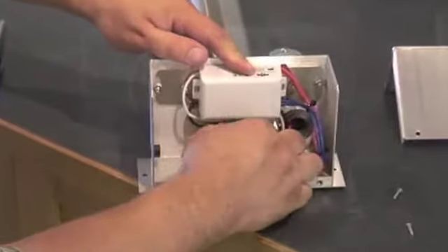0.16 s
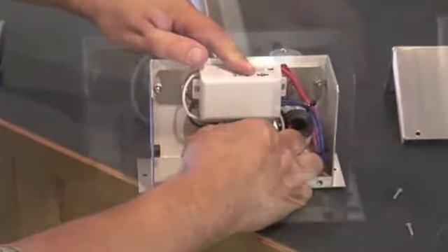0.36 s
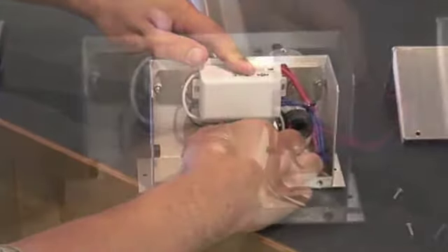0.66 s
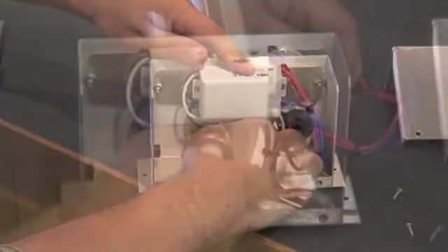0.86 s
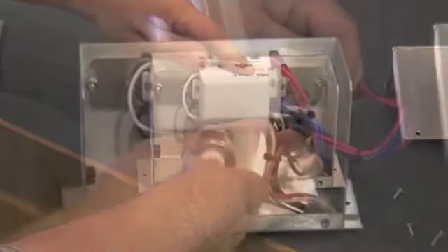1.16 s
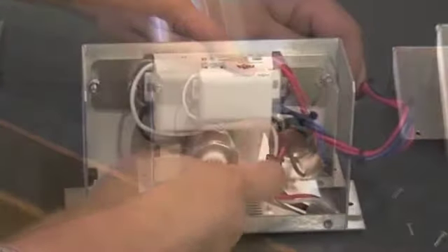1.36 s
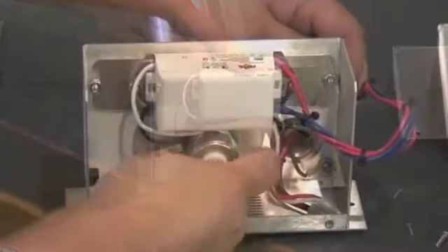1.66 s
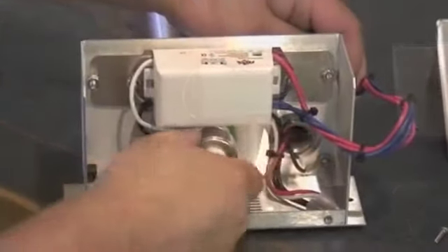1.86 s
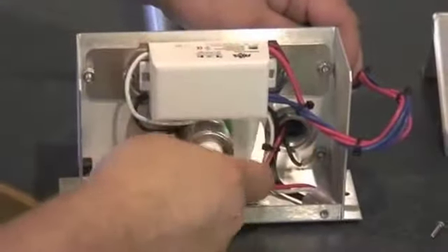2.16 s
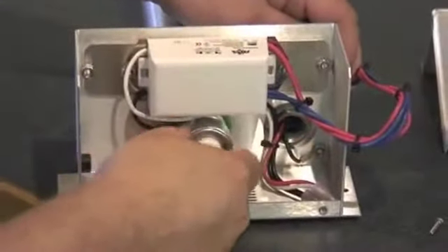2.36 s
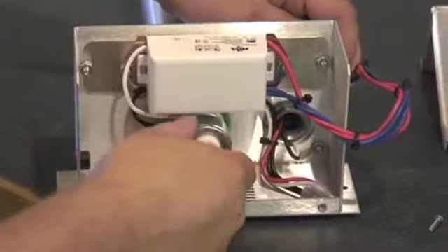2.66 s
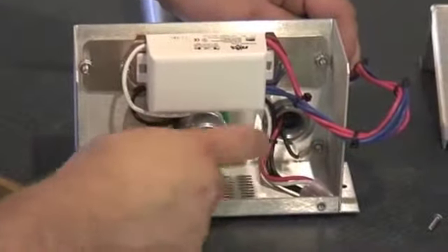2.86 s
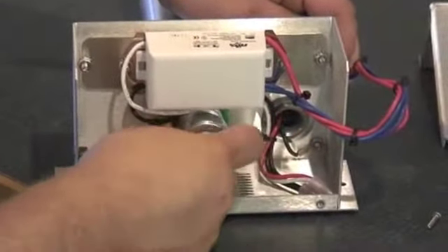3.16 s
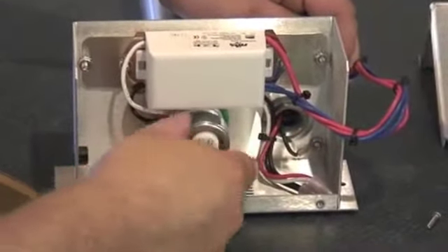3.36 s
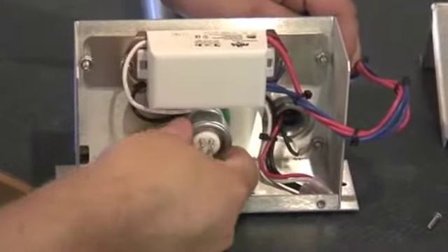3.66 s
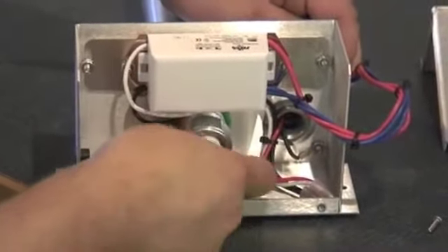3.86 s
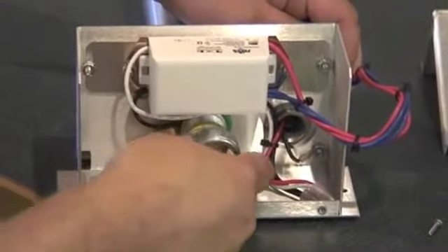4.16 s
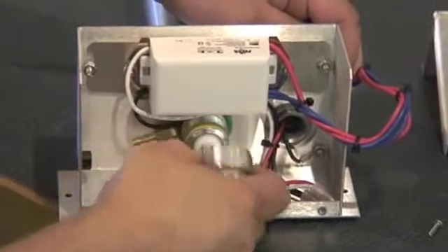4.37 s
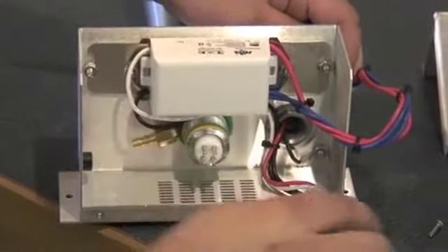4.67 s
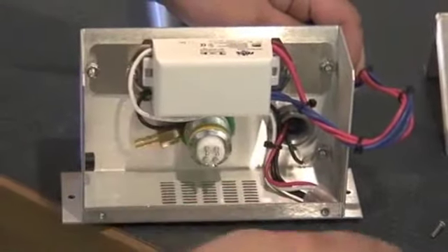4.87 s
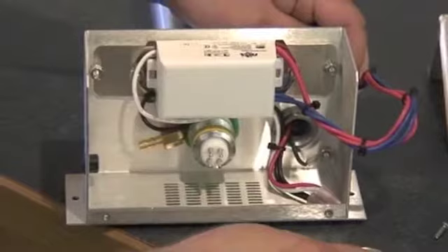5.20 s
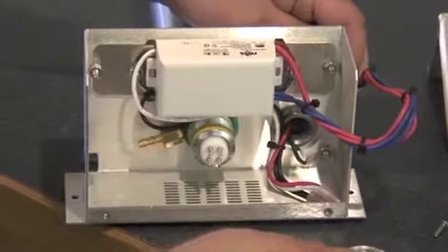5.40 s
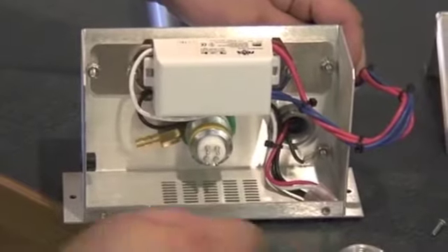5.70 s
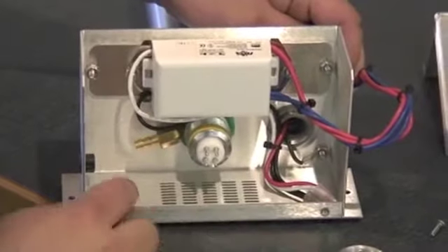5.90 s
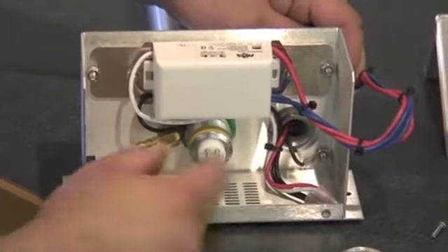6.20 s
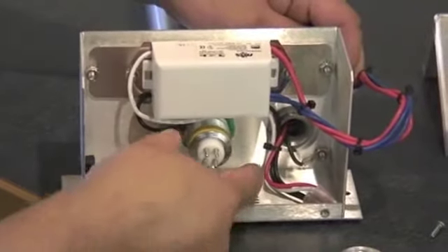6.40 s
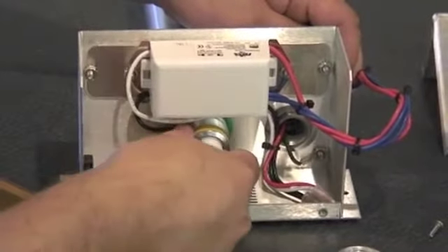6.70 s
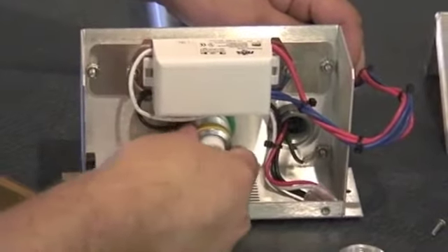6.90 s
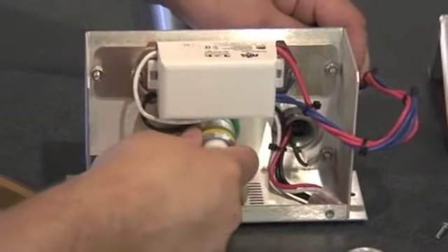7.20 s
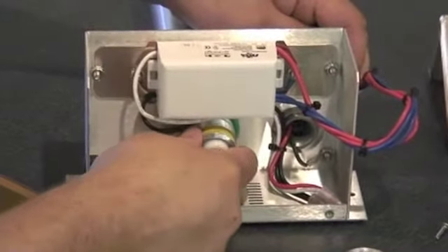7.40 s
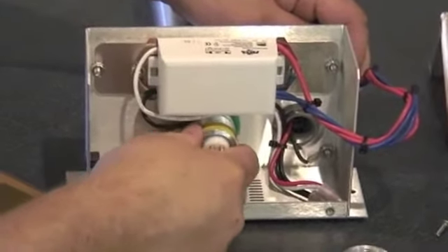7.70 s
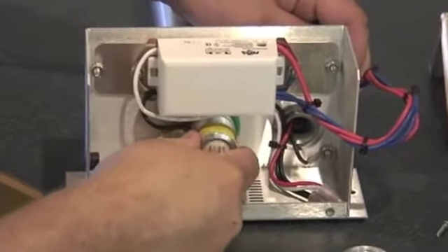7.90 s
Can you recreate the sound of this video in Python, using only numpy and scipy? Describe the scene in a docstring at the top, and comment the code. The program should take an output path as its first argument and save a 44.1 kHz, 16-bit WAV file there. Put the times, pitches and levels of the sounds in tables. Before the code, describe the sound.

Faint scrapes grow into a run of sharp, ringing zips and clicks as a threaded metal ring is spun off by hand in a sheet-metal box. The hardest flicks leave a thin singing tone. It loosens with lighter clicks, then two dull knocks and a clear clink sound on the bench. Fingers brush the metal softly at the end. Close microphone, short room echo, low fan hum.

```python
"""A metal nut is spun off a threaded lamp socket in a sheet-metal housing, one finger flick at a time.
Uneven catches make its rasp, short rebounds its clicks, and both excite the modes of the housing; the thread chirps
and the hardest flicks leave the nut singing. Two clear knocks and some faint ones excite the bench, the nut clinks
at a tap and as it is set down, and fingers rub on the socket. Filtered noise makes the small room's echoes and
the humming ventilation."""
import sys
import numpy as np
from scipy import signal
from scipy.fft import rfft, irfft, next_fast_len
from scipy.io import wavfile

SR = 44100
rng = np.random.default_rng(int(sys.argv[2]) if len(sys.argv) > 2 else 0)


def master(y):
    """Save y as 16-bit WAV."""
    cut = np.clip(np.atleast_2d(y).T, -1, 1)
    pcm = np.round(cut * 32767)  # scale
    wavfile.write(sys.argv[1], SR, pcm.astype(np.int16))


N = 355005
TIME = np.arange(N) / SR
MEDIUM_DB = -30  # force level at which click brightness and chirp pitch take their stated values


def from_db(db):
    """Level law: decibels to amplitude gain."""
    return 10 ** (np.asarray(db) / 20)


def unit(x):
    """Energy normalization: scale each channel to an energy of one."""
    return x / np.sqrt(np.sum(x ** 2, axis=-1, keepdims=True) + 1e-20)


def at_hz(points, hz):
    """Spectral interpolation: read a table on a log-frequency axis."""
    points = np.array(points)
    return np.interp(np.log(hz), np.log(points[:, 0]), points[:, 1])


def through(x, response):
    """Linear superposition: convolve a sound with an impulse response."""
    return signal.fftconvolve(np.atleast_2d(x), np.atleast_2d(response), axes=-1)[:, :N]


def lowpass(x, hz, order=1):
    """Treble loss: attenuate what lies above a cutoff."""
    return signal.sosfilt(signal.butter(order, min(hz, .45 * SR), fs=SR, output="sos"), x)


def tilt_at(x, hz, db, q):
    """Resonant filtering: raise or lower the band around one frequency."""
    resonance = signal.iirpeak(min(hz, .45 * SR), q, fs=SR)
    return x + (from_db(db) - 1) * signal.lfilter(*resonance, x)


def add(track, s, burst, bright_hz, wall_db=0, order=2):
    """Contact filtering: soft contact loses treble, a sideways push drives the main mode of the housing wall."""
    contact = lowpass(burst, bright_hz, order)
    contact = tilt_at(contact, 1550, wall_db, q=4.8)
    start = max(round(s * SR), 0)
    track[start:start + len(contact)] += contact[:max(N - start, 0)]


def body(spectrum, modes=(), size=32768):
    """Modal response: the minimum-phase ring of named resonances over a bed of dense modes."""
    hz = np.maximum(np.arange(size // 2 + 1) * SR / size, 1)
    power = from_db(at_hz(spectrum, hz)) ** 2
    for centre, width, db in modes:
        resonance = 1 / (1 + (2 * (hz - centre) / width) ** 2)
        skirt = 1 / (1 + (10 * np.log(hz / centre)) ** 2)
        power = power + from_db(db) ** 2 * resonance * skirt
    # keeping one side of the cepstrum makes the response causal
    cepstrum = irfft(np.log(power))[:size // 2]
    cepstrum[0] /= 2
    return unit(irfft(np.exp(rfft(cepstrum, size))))


def rebounds(hold_s, t60, count=3):
    """Repeated impact: a colourless cluster that builds, holds briefly and decays exponentially."""
    t = TIME[:SR // 8]
    build = np.minimum(3 * (t + 1 / SR) / hold_s, 1)
    fade = build * from_db(-60 * np.maximum(t - hold_s, 0) / t60)
    cluster = rng.standard_normal(len(t)) * fade
    for _ in range(count):
        # flatten the spectrum, then restore the fade
        phase = np.angle(rfft(cluster, 2 * len(t)))
        cluster = irfft(np.exp(1j * phase))[:len(t)] * np.sqrt(np.sqrt(fade))
    return unit(cluster)


def blows(rows, hold_s, bounce_t60, contact_s, order=2):
    """Impact excitation: the force of single blows, each a quick cluster of rebounds."""
    force = np.zeros(N)
    for s, db, *colour in rows:
        burst = from_db(db) * np.sqrt(contact_s * SR) * rebounds(hold_s, bounce_t60)
        add(force, s, burst, *colour, order=order)
    return force


def grains(catches, low_hz, high_hz, q, count=10):
    """Damped resonance: each catch rings for a few cycles at one of several pitches."""
    dealt = rng.integers(0, count, len(catches))
    total = np.zeros(len(catches))
    for k, hz in enumerate(np.geomspace(low_hz, min(high_hz, .45 * SR), count)):
        total += signal.lfilter(*signal.iirpeak(hz, q, fs=SR), catches * (dealt == k)) / np.sqrt(hz)
    return total


def slides(rows, catches_per_s, spread_db, grain_db, light_hz):
    """Sliding friction: uneven catches swell and fade by 20 dB in the rise and fall times, light contact duller."""
    force = np.zeros(N)
    for s, db, rise, fall, *colour in rows:
        t = TIME[:SR // 2] - min(s, 1 / 4)  # zero at the peak
        swell = from_db(-20 * np.where(t < 0, np.abs(t / rise) ** 1.61, t / fall))
        chance, sign = rng.random((2, len(t)))
        sizes = from_db(spread_db * np.clip(rng.standard_normal(len(t)), -2, 2))
        catches = (chance < catches_per_s / SR) * np.sign(sign - .5) * sizes
        ringing = grains(rng.permutation(catches), low_hz=2050, high_hz=9400, q=4.9)
        rasp = unit(catches) + from_db(grain_db) * unit(ringing)
        dull = lowpass(rasp, light_hz)
        rasp = dull + swell * (rasp - dull)
        burst = from_db(db) * unit(rasp * swell) * np.linalg.norm(swell)
        add(force, s + t[0], burst, *colour)
    return force


# spectral density of the ventilation's rush: pitch_hz, level_db (relative, per Hz)
AIR_SPECTRUM = [(20, -31), (45, -11.5), (65, -4.5), (150, -4.5), (210, -9), (440, -15), (1000, -21),
                (2500, -27), (5700, -31.5), (12700, -33.5), (15000, -52)]
# fan and duct tones: pitch_hz, width_hz (at half amplitude), level_db (before the hum trim)
FAN_TONES = [(44, 12, -55.5), (121.9, 5.2, -58), (241.9, 5.3, -62.5), (356.1, 8.1, -60.5),
             (385.5, 4.4, -64.5)]
# left-right coherence of the ventilation: pitch_hz, likeness (0 to 1)
AIR_COHERENCE = [(50, 0.97), (150, 0.54), (400, 0.31), (6000, 0.19)]


def ventilation(air_db, hum_db, left_db):
    """Stationary noise: a steady rush of air with narrow, wavering fan tones."""
    half = next_fast_len(N // 2 + 1)
    hz = np.maximum(np.arange(half + 1) * SR / (2 * half), 1)
    power = from_db(air_db) ** 2 * unit(from_db(at_hz(AIR_SPECTRUM, hz))) ** 2
    for centre, width, db in FAN_TONES:
        tone = unit(1 / (1 + ((hz - centre) / width * 2) ** 2))
        power = power + (from_db(db + hum_db) * tone) ** 2
    alike = np.clip(at_hz(AIR_COHERENCE, hz), 0, 1)
    mid, side = rfft(rng.standard_normal((2, 2 * half)))
    both = mid + np.sqrt((1 - alike) / (1 + alike)) * side * [[1], [-1]]
    balance = from_db(np.array([[1], [-1]]) * left_db)
    return irfft(both * np.sqrt(power * half))[:, :N] * balance


ROOM_T60_S = 0.35


def room(x, early_db, tail_db, early_t60, wall_hz, side_db):
    """Reverberation: direct sound, near reflections from the bench and a duller exponential tail."""
    t = TIME[:SR]
    near, far = rng.standard_normal((2, 2, len(t)))
    near = unit(near * from_db(-60 * t / early_t60))
    far = unit(far * from_db(-60 * t / ROOM_T60_S) * np.minimum(t / .012, 1))  # 12 ms onset
    far = lowpass(far, wall_hz)
    mid, side = from_db(early_db) * near + from_db(tail_db) * far
    # echoes differ between the microphone ports mostly in the treble
    treble = signal.butter(1, 5000, "high", fs=SR, output="sos")
    side = from_db(side_db) * signal.sosfilt(treble, side)
    return x + through(x, [mid + side, mid - side])


def ports(x, spacing_s, widest_rad, size=1024):
    """Phase difference: each frequency reaches two close microphone ports from its own direction."""
    hz = np.arange(size // 2 + 1) * SR / size
    direction = np.sin(2 * np.pi * np.cumsum(rng.random(len(hz))) / 10)
    # the phase lead grows with frequency up to its limit, so the treble spreads most
    lead = np.exp(1j * np.minimum(np.pi * hz * spacing_s, widest_rad) * direction * [[1], [-1]])
    response = np.roll(irfft(lead), size // 2, axis=1)
    return signal.fftconvolve(x, response, axes=-1)[:, size // 2:size // 2 + N]


# dull knocks on the bench: start_s, level_db (of force), brightness_hz (of contact)
KNOCKS = [(.157, -38.5, 1480), (5.056, -29, 1850), (5.192, -30, 4300), (5.781, -46, 6000),
          (6.944, -45, 1400)]
# dense modes of the bench: pitch_hz, level_db (relative)
BENCH_SPECTRUM = [(150, -53), (450, -11), (750, -2), (1000, -2.5), (1200, -5), (1750, -6.5), (2500, -4.5),
                  (3600, -6.5), (4200, -19), (5200, -8), (14000, -16)]
# named modes of the bench: pitch_hz, width_hz, level_db (relative)
BENCH_MODES = [(990, 120, 3.5), (1700, 240, 2.5), (2100, 330, 0.5)]


def bench_knocks():
    """Impact on a damped plate: dull blows excite the modes of the bench."""
    force = blows(KNOCKS, hold_s=0.0075, bounce_t60=0.044, contact_s=0.0053, order=4)
    return through(force, body(BENCH_SPECTRUM, BENCH_MODES))


# the nut struck by itself, at a tap and as it touches down: start_s, level_db (of force), brightness_hz (of contact)
CLINKS = [(3.400, -43.5, 6000), (5.741, -31, 14000)]
# dense modes of the nut: pitch_hz, level_db (relative)
NUT_SPECTRUM = [(500, -57), (1500, -20), (2500, -13), (4800, -15), (6200, -9), (9300, -13), (14000, -19)]
# named modes of the nut: pitch_hz, width_hz, level_db (relative)
NUT_MODES = [(2530, 83, -2.5), (3410, 290, 1), (3590, 12, 8.5), (3960, 67, 3), (7650, 120, 0),
             (9300, 160, -4)]


def nut_clinks():
    """Free modal ringing: blows excite the nut's own resonances."""
    force = blows(CLINKS, hold_s=0.0057, bounce_t60=0.027, contact_s=0.0064)
    return through(force, body(NUT_SPECTRUM, NUT_MODES))


# skin sliding on metal: peak_s, level_db (of force), rise_s
RUBS = [(0.058, -48, 0.017), (5.958, -46.5, 0.13), (6.022, -41.5, 0.023), (6.185, -51.5, 0.042),
        (6.365, -46.5, 0.03), (7.125, -41, 0.034), (7.607, -53, 0.0054), (8.045, -44.5, 0.074)]
# a quick rub is brighter and ends sooner
RUB_HZ, RUB_DULLING_OCTAVES_PER_S = 12700, 15
RUB_FALL_S, RUB_FALL_PER_RISE = 0.011, 0.62


def rubs():
    """Fine friction: skin catches on the metal; slow rubs are dull and linger."""
    rows = []
    for s, db, rise in RUBS:
        fall = RUB_FALL_S + RUB_FALL_PER_RISE * rise
        bright_hz = RUB_HZ * 2 ** (-RUB_DULLING_OCTAVES_PER_S * rise)
        rows.append((s, db, rise, fall, bright_hz))
    return slides(rows, catches_per_s=5000, spread_db=4, grain_db=-16.5, light_hz=12100)


# response of the rubbing skin: pitch_hz, level_db (relative)
SKIN_SPECTRUM = [(200, -20), (900, 1.5), (2000, -5.5), (4700, -1), (9500, 0.5), (12000, -5), (15000, -35)]


def rubbing_fingers(skin):
    """Damped radiation: the rubbing force sounds through the broad response of skin."""
    return from_db(-1.5) * through(skin, body(SKIN_SPECTRUM))


# the hardest flicks leave the nut singing: start_s, level_db
SINGS = [(0.786, -45), (1.088, -53), (1.367, -54)]
# the modes that sing on: pitch_hz, level_db (relative to the singing), t60_s
SING_MODES = [(3430, -1, .3), (3550, -5, .5), (4020, 0.5, 1.1), (4506, -2, 0.27)]


def singing():
    """Light damping: modes decay exponentially while the finger is clear of the nut."""
    out, t = np.zeros(N), TIME[:SR]
    for s, db in SINGS:
        ring = np.zeros(len(t))
        for hz, mode_db, t60 in SING_MODES:
            decay = np.exp(-np.log(1000) * t / t60)
            ring += from_db(db + mode_db) * decay * np.sin(2 * np.pi * hz * t)
        add(out, s, ring, bright_hz=SR)
    return out


# the thread chirps as the finger takes a new grip: start_s, level_db
CHIRPS = [(.998, -35.5), (1.279, -40), (1.597, -40.5), (2.279, -46.5), (2.382, -46.5), (2.726, -40),
          (3.569, -40), (4.153, -31.5), (7.912, -46)]
# each flick also chirps as it breaks loose (dB against the flick); pitch rises with force
BREAKAWAY_DB, CHIRP_HZ, CHIRP_HZ_PER_DB = -8.5, 2620, 26


def chirps(length_s, width_hz):
    """Stick-slip: brief squeaks, each around one pitch, at a new grip and at the start of every flick."""
    out = np.zeros(N)
    breakaways = [(s - run_up, db + BREAKAWAY_DB) for s, db, run_up, *_ in FLICKS]
    for s, db in list(CHIRPS) + breakaways:
        hz = CHIRP_HZ + CHIRP_HZ_PER_DB * (db - MEDIUM_DB)
        peak = signal.iirpeak(hz, hz / width_hz, fs=SR)
        squeak = signal.lfilter(*peak, rebounds(length_s, t60=0.12))
        squeak = signal.lfilter(*peak, squeak)
        add(out, s, from_db(db) * np.sqrt(length_s * SR) * unit(squeak), bright_hz=SR)
    return out


# the nut knocking against the thread: start_s, level_db (of force), wall_push_db
CLICKS = [(.157, -44.5, 13), (0.526, -32.5, -14), (.779, -15.5, -14), (1.021, -26, -3), (1.085, -16.5, 2),
          (1.365, -19, -4), (1.394, -34, 9), (1.66, -16, -7), (1.674, -26.5, 14.5), (1.739, -24.5, 7),
          (2.111, -40.5, 18), (2.148, -40.5, 14), (2.467, -16, -19), (2.573, -34.5, 2.5), (2.9, -23.5, -4),
          (3.114, -28.5, 4.5), (3.182, -28.5, 7), (3.479, -22.5, -2), (3.488, -24, -10), (3.739, -37.5, 10),
          (3.994, -45.5, -8), (4.054, -48, 13.5), (4.068, -37.5, 2), (4.082, -39, 10), (4.092, -35, 6.5),
          (4.109, -27.5, -12), (7.92, -50.5, 11)]
CLICK_HZ, CLICK_OCTAVES_PER_DB = 5600, 0.075  # brightness at the medium level, and its rise with force


def clicks():
    """Contact stiffness: the nut knocks against its play, and a harder contact is brighter."""
    rows = []
    for s, db, wall_db in CLICKS:
        bright_hz = CLICK_HZ * 2 ** (CLICK_OCTAVES_PER_DB * (db - MEDIUM_DB))
        rows.append((s, db, bright_hz, wall_db))
    return blows(rows, hold_s=0.0046, bounce_t60=0.048, contact_s=0.0038)


# the finger flicks the nut round: peak_s, level_db (of force), run_up_s, wall_push_db, brightness_hz (of contact)
FLICKS = [(0.164, -44, 0.0052, 8, 7000), (.376, -34, 0.022, 14, 6500), (.572, -40.5, 0.051, 6.5, 4180),
          (.787, -21.5, 0.029, 1, 10400), (1.08, -21.5, 0.018, 1, 7650), (1.367, -20, .026, -4, 7240),
          (1.67, -23, 0.028, -1, 5960), (2.058, -26.5, 0.037, 4.5, 6840), (2.474, -26, 0.03, -1.5, 6700),
          (2.842, -25.5, 0.041, 7, 6570), (3.207, -29, 0.029, 10.5, 5800), (3.498, -30.5, 0.021, 5.5, 6760),
          (4.145, -40.5, 0.077, 8.5, 5600)]
# some flicks leave the nut coasting into a second, weaker rasp: peak_s, level_db (of force)
COASTS = [(.465, -40.5), (.828, -36), (1.416, -42), (3.573, -43)]
# after its peak a flick dies away, more slowly after a long run-up
FLICK_FALL_S, FALL_PER_RUN_UP = 0.026, 0.34
COAST_RISE_S, COAST_FALL_S, COAST_HZ = 0.042, 0.044, 6500


def flicks():
    """Driven friction: each flick runs the nut up along the thread; sometimes it coasts on."""
    driven = []
    for s, db, run_up, wall_db, bright_hz in FLICKS:
        fall = FLICK_FALL_S + FALL_PER_RUN_UP * run_up
        driven.append((s, db, run_up, fall, bright_hz, wall_db))
    coasting = [(s, db, COAST_RISE_S, COAST_FALL_S, COAST_HZ) for s, db in COASTS]
    return slides(driven + coasting, catches_per_s=2400, spread_db=2.5, grain_db=-8.5, light_hz=6500)


# two resonances raised or lowered at each new grip: start_s, first_hz, first_db, second_hz, second_db
GRIPS = [(.1, 1740, 3, 2740, -13), (.68, 3450, 0, 6100, -5), (.96, 2880, 2.5, 8450, -4),
         (1.25, 2220, 3, 8500, -3), (1.57, 2870, 2.5, 2320, -5), (2.25, 6060, 6.5, 3800, 1),
         (2.7, 2660, -2, 5170, -6), (3.05, 9600, 7.5, 7800, -4), (3.88, 3040, -1, 7400, -3)]


def gripped(force, q):
    """Contact-point coupling: every grip moves the contact and so raises or lowers two resonances of the force."""
    out = np.zeros(N)  # silent before the first grip
    edges = [max(round(row[0] * SR), 0) for row in GRIPS] + [N]
    for (_, first_hz, first_db, second_hz, second_db), a, b in zip(GRIPS, edges, edges[1:]):
        once = tilt_at(force[a:b], first_hz, first_db, q)
        out[a:b] = tilt_at(once, second_hz, second_db, q)
    return out


# dense weaker modes of the housing: pitch_hz, level_db (relative)
HOUSING_SPECTRUM = [(480, -33), (1000, -19), (2050, -17), (3000, -12), (3550, -8), (3920, -13), (4400, -8),
                    (5250, -13.5), (5900, -13), (7800, -16), (10000, -17.5), (14000, -30)]
# named modes of the housing with socket and nut: pitch_hz, width_hz, level_db (relative)
HOUSING_MODES = [(651, 58, -16), (1632, 32, 4), (1703, 30, -2), (1770, 60, -9), (2277, 32, -1),
                 (2345, 40, -6), (2574, 85, -6), (2725, 24, 0), (2810, 110, -1), (2954, 52, .5),
                 (3013, 26, -5), (3193, 27, -9), (3392, 26, 1), (3570, 30, -6), (4252, 80, -4),
                 (4472, 45, -3), (4512, 8, -6), (6080, 6, -7), (6270, 130, -6), (7400, 40, -7),
                 (8390, 40, -6), (9620, 60, -13)]


def ringing_housing(thread, skin, squeaks):
    """Forced modal vibration: thread forces ring the sheet metal; rubs and chirps stir it faintly."""
    force = from_db(.5) * thread + from_db(-14) * (skin + squeaks)
    return through(force, body(HOUSING_SPECTRUM, HOUSING_MODES))


def scene():
    """Superposition: work on the housing, the knocks and clinks on the bench, the room behind."""
    thread = gripped(flicks() + clicks(), q=13.7)
    skin = rubs()
    squeaks = chirps(length_s=0.0043, width_hz=1120)
    housing = ringing_housing(thread, skin, squeaks)
    nut = squeaks + singing()
    work = housing + nut + rubbing_fingers(skin) + nut_clinks()
    near = room(work, early_db=-17.5, tail_db=-8.0, early_t60=0.078, wall_hz=10600, side_db=2.0)
    far = room(bench_knocks(), early_db=2, tail_db=-0.5, early_t60=0.096, wall_hz=4970, side_db=0.0)
    background = ventilation(air_db=-51, hum_db=-0.5, left_db=0.17)
    return ports(near + far, spacing_s=.000028, widest_rad=1.0) + background


CUTOFF_HZ = 14600


def record(dry):
    """Band limiting: an elliptic low-pass cuts the top steeply."""
    return signal.sosfilt(signal.ellip(10, .1, 80, CUTOFF_HZ, fs=SR, output="sos"), dry)


dry = scene()
out = record(dry)
master(out)
```